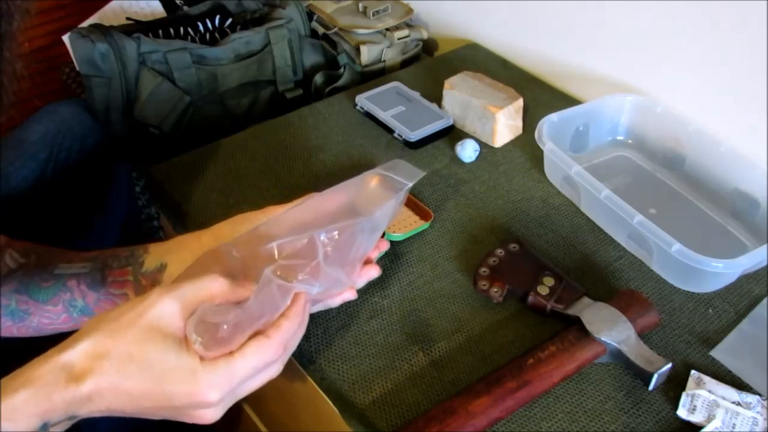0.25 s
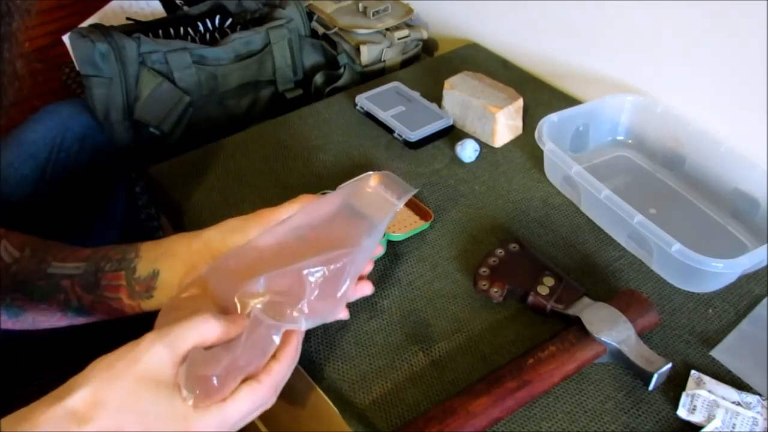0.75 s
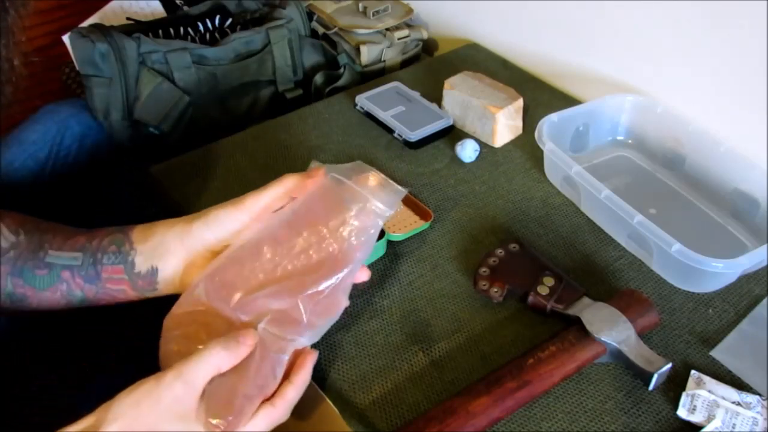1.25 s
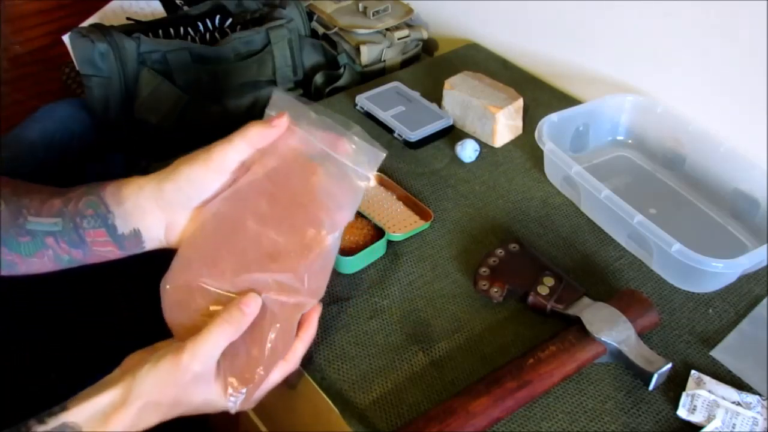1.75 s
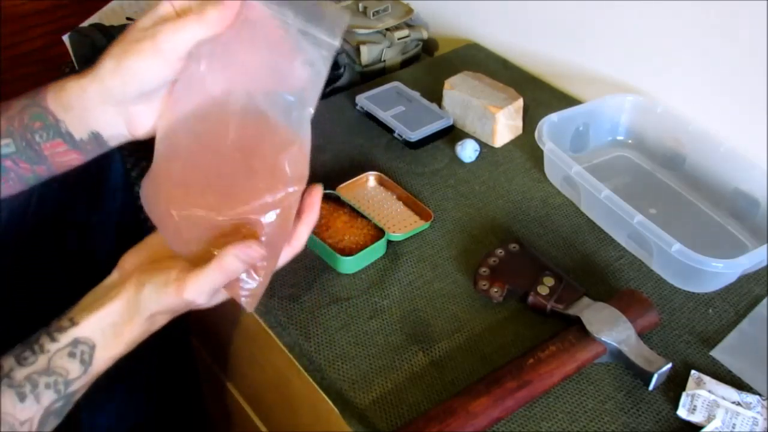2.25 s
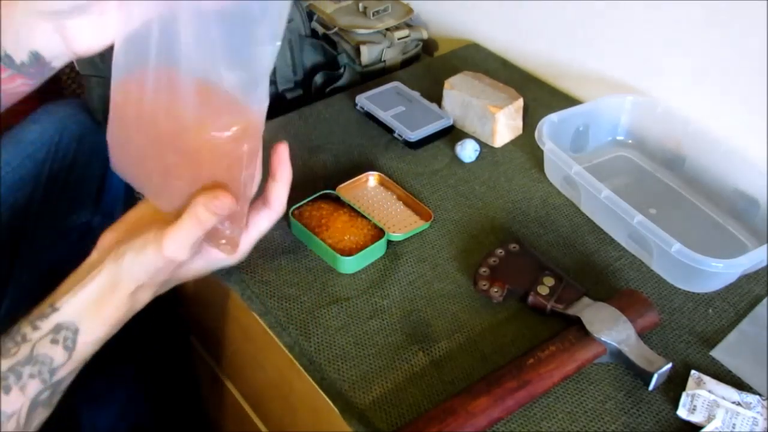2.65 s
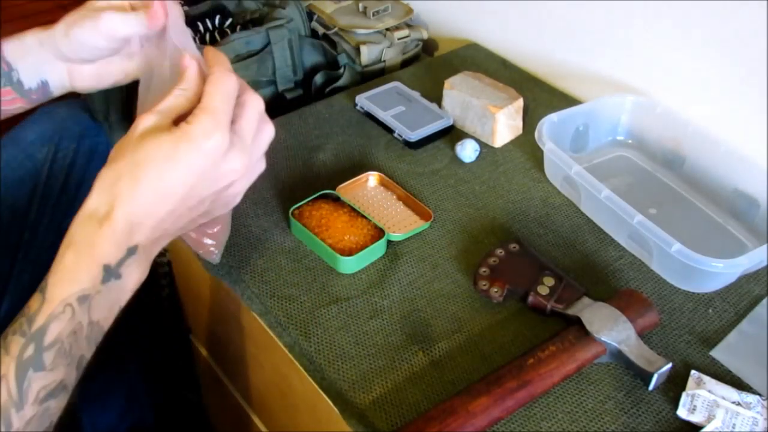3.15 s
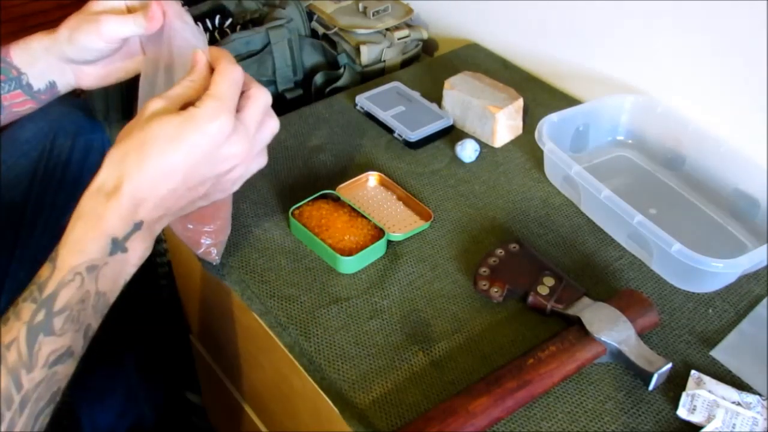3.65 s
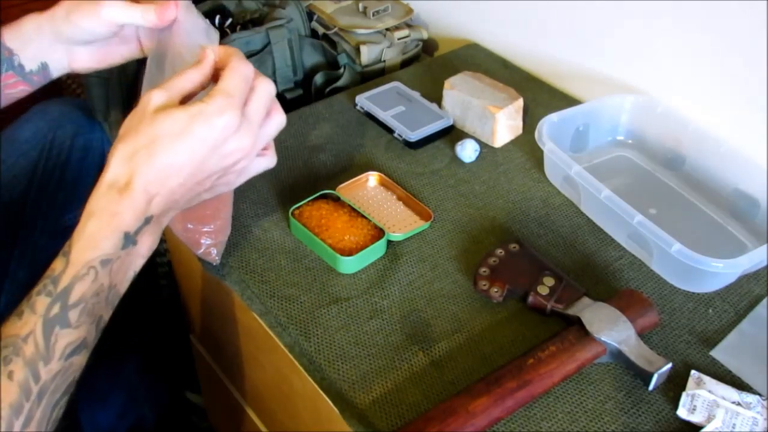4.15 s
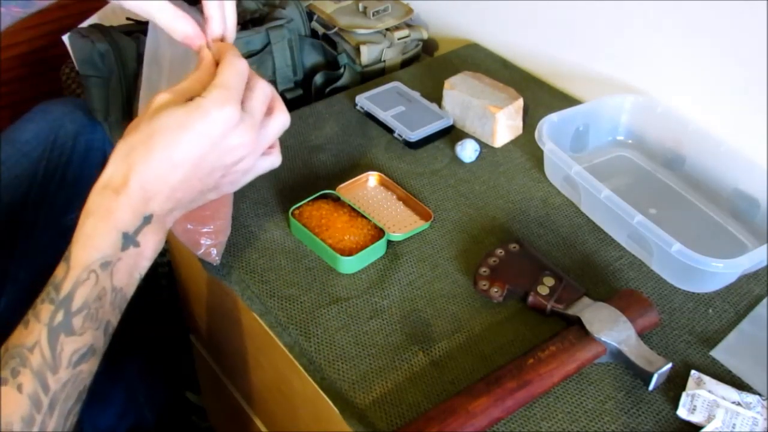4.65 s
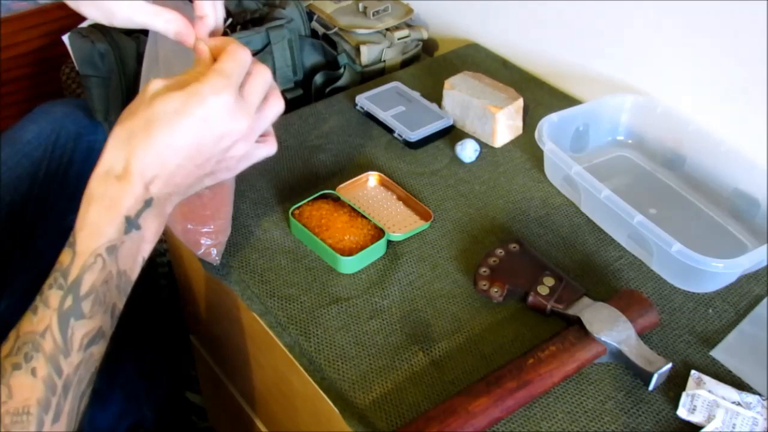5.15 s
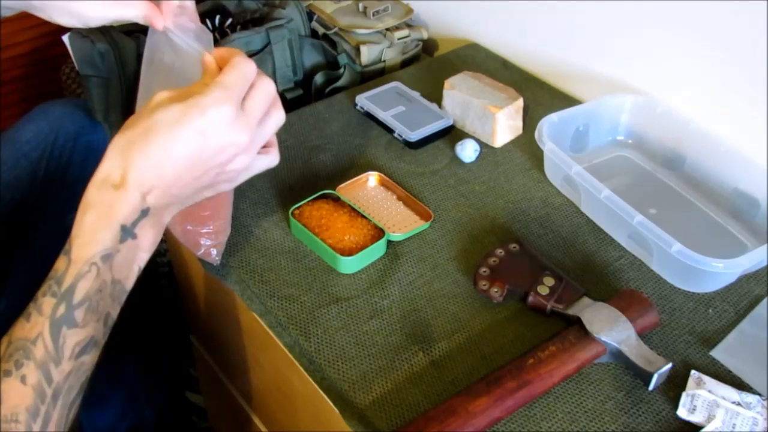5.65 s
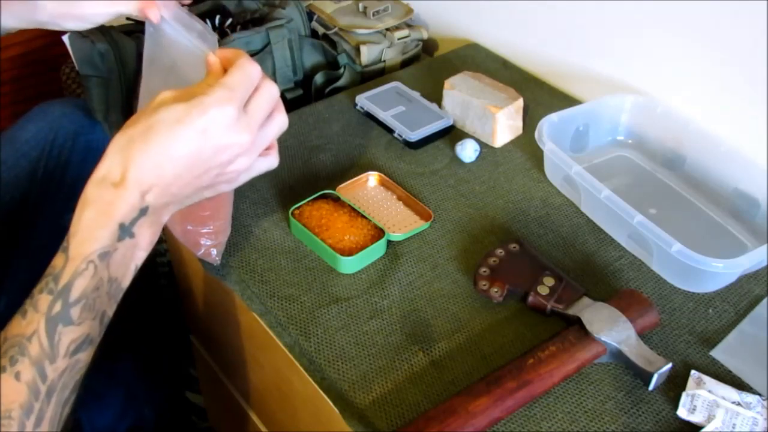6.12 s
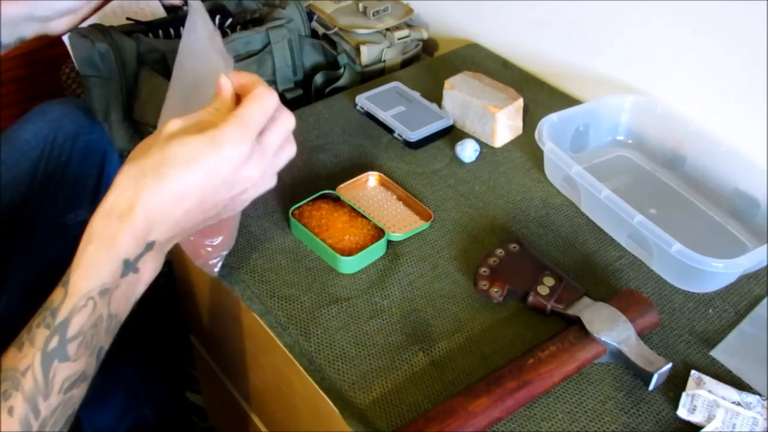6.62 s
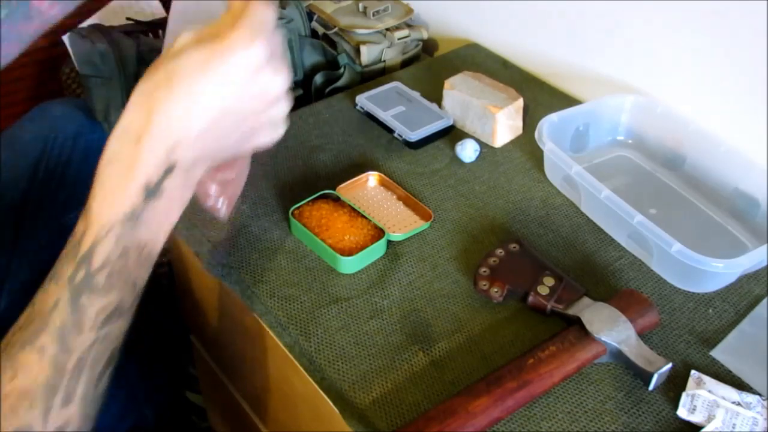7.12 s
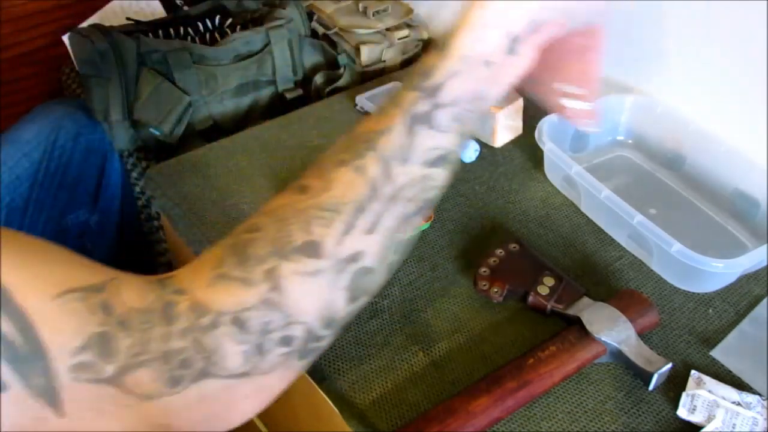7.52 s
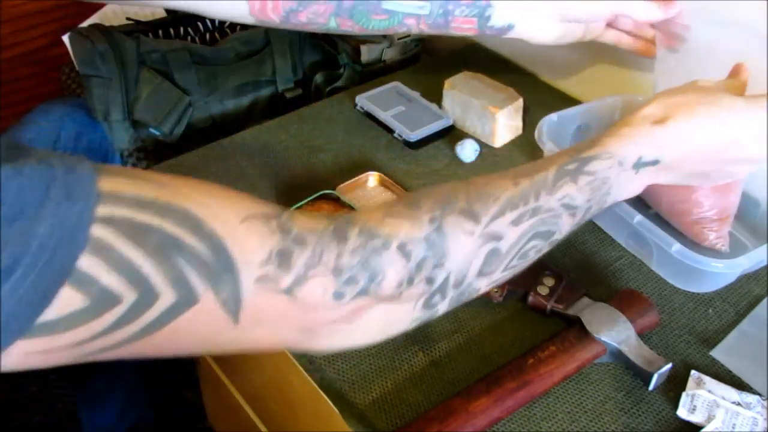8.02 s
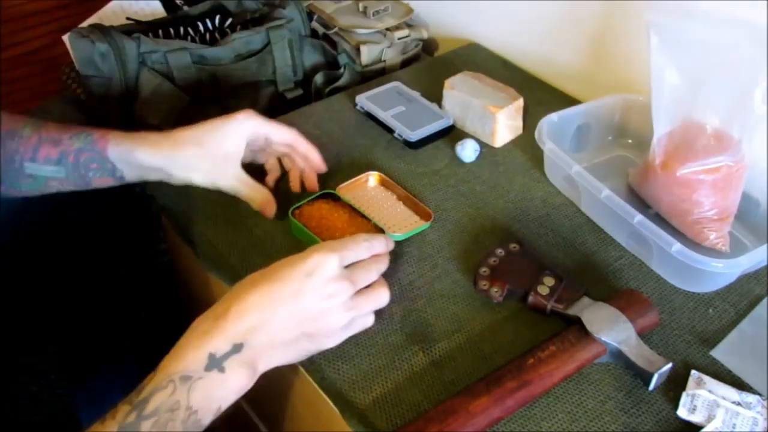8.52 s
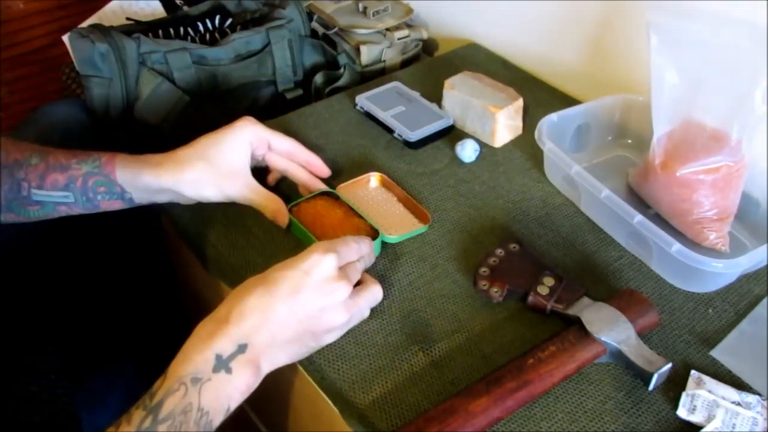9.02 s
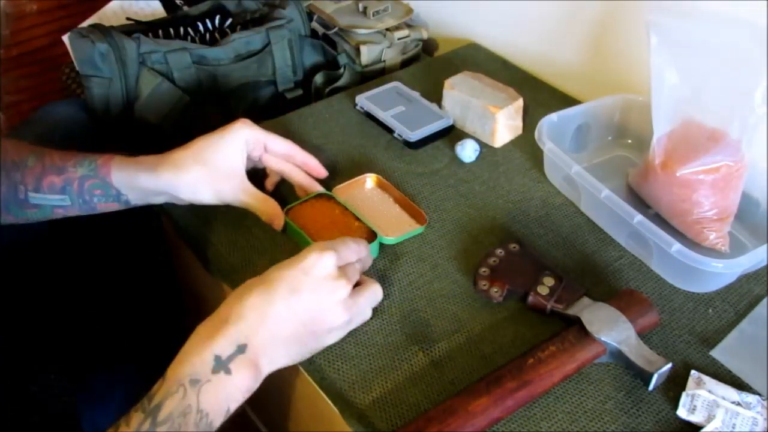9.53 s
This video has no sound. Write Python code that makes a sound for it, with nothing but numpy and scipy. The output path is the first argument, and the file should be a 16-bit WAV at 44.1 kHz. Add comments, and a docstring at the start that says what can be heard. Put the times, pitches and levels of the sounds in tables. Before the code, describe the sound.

A small quiet room, heard closely in stereo, with a steady soft hush, wide in the bass. From 0 to 1.3 s beads slide faintly in a plastic bag, with a hollow airy hum and a few light film clicks. From 1.4 to 2.8 s the slide swells into hissing, pattering swishes, with sharp snaps around 2.1 s. From 2.9 to 4.4 s the film crinkles in bursts, strongest near 3.2 and 4.25 s. Sparse, quieter rustles continue to 6.2 s, then thicker crackling runs from 6.3 to 7.1 s. A crisp rustle comes at 7.5 s, and the loudest crunch at 7.9 s as the bag lands in a tub, with a last snap at 8.1 s. After a near-silent moment, a bead-filled tin rattles finely from about 8.8 s, growing brighter to the end, with dull taps near 8.9 and 9.6 s and soft low table nudges.

```python
"""A quiet room: hands tilt, lift and close a plastic bag of small hard beads over a table.
Beads slide and patter as noise shaped by random bursts, air in the bag hums, film snaps as clicks and pops.
The bag is dropped in a tub, a burst of loud rustles; then a filled tin is shaken gently, its beads rattle
and it taps the table mat as decaying tones. Arms stir softly, the room rings and a steady hush lies beneath.
Two close microphones hear it, and the hush is wide in the bass."""
import sys
import numpy as np
from scipy import signal
from scipy.fft import rfft, irfft, next_fast_len
from scipy.io import wavfile
from scipy.ndimage import uniform_filter1d, map_coordinates

SR = 44100
rng = np.random.default_rng(int(sys.argv[2]) if len(sys.argv) > 2 else 0)


def master_out(mix):
    """Clip the mix to full scale and print it as 16-bit PCM to the path in sys.argv[1]."""
    frames = np.transpose(np.atleast_2d(mix))
    ceiling = np.clip(frames, -1, 1)
    pcm = np.round(ceiling * 32767).astype(np.int16)
    wavfile.write(sys.argv[1], SR, pcm)


def gain_from_db(level_db):
    """Turn a decibel level (scalar or array-like) into a linear amplitude factor."""
    decades = np.asarray(level_db, float) / 20
    return 10 ** decades


N = 431279

# steady room and microphone noise: f/Hz, level per Hz/dB
HUSH_SPECTRUM = [(12, -55), (20, -21.5), (111, -6.5), (199, -6), (271, -2), (339, -1.5), (531, -3.5),
                 (594, -4), (1340, -6.5), (2090, -10), (8270, -16), (14900, -22.5), (16200, -34)]
# width of that noise: f/Hz, side minus mid level/dB
HUSH_WIDTH = [(60, 9), (110, 10), (200, 7.5), (380, 6), (700, 5.5), (1290, 2), (2380, 1), (4400, -1),
              (8120, 1), (15000, -2)]
# soft stir of arms and cloth: f/Hz, level per Hz/dB
STIR_SPECTRUM = [(25, -9.0), (60, -2), (150, -2.0), (260, -4), (400, -30.0)]
# beads sliding in the bag, pouring first, then a faint stir in the hands:
# t/s, patter level/dB, body re patter level/dB, finest hiss re patter level/dB
SLIDE = [(0, -42, -12, -6), (.27, -40, -16, -6), (.34, -45, -10, 2), (.47, -45, -4.5, 0.5),
         (.61, -51, -5, -3.5), (.74, -54.5, -5, -0.5), (.93, -50.5, -4.5, 2), (1.13, -52, -3, -3),
         (1.234, -43, -3.5, -3.5), (1.33, -43, -4, -1.5), (1.448, -34.5, -11, 0), (1.48, -38, -5, -3),
         (1.62, -35, -3.5, -2.5), (1.77, -32, -5, 0.5), (1.86, -32, -0.5, 0.5), (1.966, -37, -2.5, 2.5),
         (2.08, -40, -1, 2), (2.24, -41, -2, 3.5), (2.3, -38.5, -1.5, 2.5), (2.468, -30, -1, 1.5),
         (2.544, -42, 0, 2), (2.638, -41.5, -4.5, -3), (2.748, -32.5, -2, 1.5), (2.896, -56.5, 1, -2),
         (3.45, -51, 2, 2.5), (3.77, -61, 0.5, -0.5), (4.1, -53, 0.5, -1.5), (4.5, -66, 1, 3),
         (4.7, -54, -4.5, -11), (4.9, -60, 6, -4), (5.5, -58, 5.5, 4), (5.95, -54, -6, -6.5),
         (6.3, -62, 7, -7), (6.36, -56, 4, -9), (6.5, -41, -1, 4), (6.6, -43, -2.5, -1.5),
         (6.75, -50.5, 2, -2.5), (7.25, -62.5, -4, 5), (7.5, -55, 7.5, -12), (7.62, -46.5, 0, 2.5),
         (7.7, -45.5, 4, 1.5), (7.8, -54, 5, -2), (8.22, -72, 12, -8), (8.5, -92, -6, -7)]
# rustles, a grip or jolt shakes film and beads: peak t/s, patter level/dB, rise t/s, fall t/s,
# body re patter level/dB, finest hiss re patter level/dB
RUSTLES = [(.62, -42, 0.0037, 0.082, 1, 4.5), (.942, -40, .015, .03, -6.5, -4),
           (1.01, -46.5, 0.0066, .05, 0, -10), (1.197, -45.5, .008, .12, -3, -7),
           (1.335, -41, 0.0044, .06, -8, -6), (1.741, -32.5, .008, .1, 3, 2),
           (1.978, -32.5, 0.0055, .08, 4, 0), (2.097, -36.5, .005, .05, 3, -4),
           (2.123, -34, .004, 0.063, -8, -6), (2.159, -36, .005, .08, 3.5, -9),
           (2.257, -34.5, .006, .07, 2, 4.5), (2.903, -43, 0.0054, .04, 0, 4),
           (2.971, -35, .015, .055, -4, 2.5), (3.089, -36.5, .07, .08, 0, -9),
           (3.171, -35, .01, .2, -5.5, -9), (3.21, -34, .06, 0.11, -1, 0.5),
           (3.244, -29.5, .06, 0.042, -17, -0.5), (3.321, -39, .2, .13, -5.5, -1.5),
           (3.645, -47, .02, .05, -1, -21), (3.699, -43, .04, 0.079, -0.5, -8),
           (3.835, -50.5, .03, .04, 3, -13), (3.897, -47.5, 0.0059, .04, 1, -11),
           (3.984, -48.5, .005, .06, -2, 1), (4.14, -36.5, .015, 0.048, -8, -6),
           (4.23, -28, .004, .05, -21, -0.5), (4.296, -32, .1, 0.073, 1.5, -5.5),
           (4.342, -40.5, 0.0035, .05, 1, -2), (4.41, -49, .01, .1, 3, 1), (4.428, -51, .015, .05, 6, -5),
           (4.54, -53, .006, .2, 6, 0.5), (4.629, -44, .02, .02, -14, -15), (4.656, -50, .006, .15, 5, -18),
           (5.001, -45, .006, .1, -2.5, -12), (5.171, -43.5, .006, .2, 0, -6),
           (5.229, -42, .09, .15, 1, -15), (5.27, -42.5, .01, 0.055, 3, 2.5),
           (5.383, -39, 0.081, 0.087, -0.5, -1), (5.447, -36.5, .006, 0.045, -5, -4),
           (5.55, -51, .05, .1, 0, 1), (5.62, -41, .005, .07, 3.5, -16), (5.714, -45.5, .08, .08, -9, -17),
           (5.85, -52.5, .05, .2, 3, -18), (6.055, -54, .01, .15, 4, -16), (6.125, -47, .1, .07, 0.5, -22),
           (6.238, -44.5, .03, 0.065, 0.5, -6), (6.303, -38.5, .004, 0.054, -7, -2),
           (6.368, -35.5, .005, .15, -18, 3.5), (6.415, -30, .075, .07, -2, -5),
           (6.64, -43, .006, .06, -4, -10), (6.688, -39, .07, .06, -3, -16), (6.798, -29, .005, .09, -1, 0),
           (6.887, -39, 0.0091, .15, 2, -2), (6.938, -33, .01, .1, -1, -2),
           (6.995, -28, .04, .1, -1.5, -6.5), (7.05, -31.5, .1, .07, -1, -3),
           (7.122, -43.5, .03, .09, 1, -11), (7.22, -43.5, 0.0054, .055, -1, -11),
           (7.37, -47.5, .12, .1, -3.5, -7), (7.47, -51.5, .1, .2, -3, -20),
           (7.524, -25.5, .005, .035, -7, -3.5), (7.56, -31.5, .04, .1, 0, -3.5),
           (7.792, -38.5, .006, .075, 0.5, -6), (7.886, -22.5, .012, .1, -11, 6),
           (7.903, -15, .03, 0.05, -12, -7), (7.95, -32, .03, .09, -3, -20), (8.1, -43, .04, .02, 0, -5.5),
           (8.111, -37.5, .004, .065, -4, -3)]
# share of the bag's body sound (as power) that is air-pocket hum: t/s, share
POURING = [(0, 1.0), (.6, 0.78), (1.4, 1.0), (2.5, 0.54), (2.7, 0.11)]
# resonances of the air in the bag: f/Hz, width f/Hz, level/dB
AIR_POCKET = [(490, 76, -7.5), (798, 98, 1), (1130, 36, 4), (1270, 103, 4.5), (1490, 226, 1.5),
              (1696, 130, -0.5), (2300, 710, -7.5)]
# bead noise that drives the air: f/Hz, level per Hz/dB
AIR_DRIVE = [(250, -30), (600, -2.5), (2000, -4.5), (4000, -11)]
# body sound of the film: f/Hz, level per Hz/dB
FILM_SPECTRUM = [(88, -38), (150, -4), (385, -5.5), (511, -1), (809, -7), (885, -3.5), (2200, -4.5),
                 (2860, -14.5), (4840, -120)]
# beads on the film: f/Hz, level per Hz/dB
PATTER_SPECTRUM = [(1000, -16), (1700, -3.5), (2610, 0), (3380, -2.5), (4490, -4), (4980, -4),
                   (8000, -12.5), (10400, -16.5), (17600, -120)]
# finest hiss of the bag: f/Hz, level per Hz/dB
HISS_SPECTRUM = [(3820, -8.5), (6500, 1), (7930, 0), (10800, -4), (11700, -5), (15200, -12.5),
                 (16200, -59.5)]
# where the hands are: t/s, left minus right level/dB
PLACE = [(0.0, -1.5), (0.74, -2), (2.59, -1.0), (5.09, -2), (5.69, -2), (6.65, -1.5), (7.62, -2),
         (8.33, -5.5), (8.39, -0.5), (9.78, -1.5)]
# side signal of the close sounds: f/Hz, side gain as level/dB
NEAR_WIDTH = [(150, -29), (500, -7.5), (1500, -6), (4000, -5), (8000, -4), (15000, 1.5)]
# decay of the room: f/Hz, t60 t/s
ROOM_DECAY = [(200, 0.43), (1500, 0.36), (6000, 0.27), (15000, 0.12)]
# decay of the scatter off hands and table: f/Hz, t60 t/s
SCATTER_DECAY = [(500, 0.023), (10000, .01)]
# clearest film snaps and single bead clicks, before a common trim:
# t/s, click level/dB, click f/Hz, pop re click level/dB, pop f/Hz
SNAPS = [(0.2882, -30, 4200, -8, 2260), (0.3804, -29, 3200, -13, 2640), (0.4224, -30, 6820, -15, 1280),
         (0.4404, -28, 4890, -8, 2140), (0.4514, -33, 4830, -4, 1470), (0.6196, -11, 8100, -11.5, 1130),
         (0.7994, -36, 9080, -14, 2600), (0.9073, -35, 5540, -8, 1340), (0.9388, -26, 3930, -6, 2800),
         (1.0071, -33, 5400, 2, 2410), (1.1954, -44, 5050, -6, 1310), (1.2599, -28, 4650, -9, 1130),
         (1.3336, -14, 8550, -24, 2820), (1.4144, -19, 4180, -13, 1340), (1.9782, -20.5, 3210, 3, 1630),
         (2.0622, -18, 4970, -16, 2180), (2.0961, -14, 8980, -16, 1320), (2.1054, -24, 8520, -0.5, 773),
         (2.121, -1, 8800, -19.5, 1880), (2.1314, -11, 8150, -16, 3000), (2.1434, -25, 7670, 0, 1640),
         (2.1594, -25, 4580, 2.5, 770), (2.1694, -30, 6350, -4, 773), (2.1949, -22, 6990, -17, 2200),
         (2.2548, -20, 3270, -8, 1330), (2.356, -17.5, 7120, -8, 1170), (2.3815, -18, 6190, -10, 2200),
         (2.433, -18, 4320, -7, 2510), (2.4647, -21, 5130, -7, 2300), (2.4984, -15, 5780, 0, 2540),
         (2.7183, -16.5, 7590, -5, 2030), (2.758, -21, 6260, -5, 2960), (2.9024, -20, 4500, -8, 1490),
         (2.9713, -12, 6860, -20, 1540), (3.0584, -33, 4020, -4, 2200), (3.1712, -20, 5940, -17, 1390),
         (3.1892, -12, 6480, -15, 1670), (3.2425, -14, 3910, -14, 1540), (3.3209, -18.5, 5450, -24, 799),
         (3.4084, -39, 5030, 6.5, 2020), (3.476, -28.5, 4860, -3, 2690), (3.645, -40.5, 3160, 8, 2800),
         (3.6985, -30.5, 3000, -6, 2910), (3.8334, -46, 3120, 6, 2010), (3.895, -35, 4500, -5, 1310),
         (3.9335, -41, 5060, -10, 1530), (3.9504, -36, 6900, -18, 2210), (3.9828, -40, 3550, -8, 1840),
         (4.1267, -29, 7770, -9, 2330), (4.135, -26, 5810, -14, 2330), (4.2303, -8.5, 4220, -26, 2940),
         (4.2752, -19, 3190, -12.5, 530), (4.2964, -19, 3160, -4, 1670), (4.3403, -25, 7720, 4.5, 1010),
         (4.4059, -35, 5900, -6, 1860), (4.5394, -43, 3550, 0, 616), (4.6243, -32, 3780, -4, 2720),
         (4.657, -34, 3740, -13, 1580), (4.7042, -39, 3460, -10, 1110), (4.7734, -39, 3440, -4, 1560),
         (4.9294, -47, 3490, -2, 1370), (5.0008, -27.5, 3490, -12, 1820), (5.1627, -33, 4570, -2, 2070),
         (5.1704, -36, 4680, -3, 1870), (5.2066, -31, 4230, -9, 541), (5.2586, -27, 4320, -3, 1110),
         (5.2694, -21.5, 8540, -17, 1550), (5.3566, -23.5, 4890, -7, 2480), (5.446, -25, 5040, -0.5, 1720),
         (5.6196, -30, 6060, -1, 1990), (5.6263, -32, 4330, 0, 1340), (5.7033, -29, 3870, -4, 1880),
         (5.856, -37, 4000, -8, 2310), (5.94, -42, 3070, -2, 606), (5.9794, -38, 5520, -8, 721),
         (6.0536, -36, 5250, -6, 2470), (6.101, -37, 3310, -8, 1570), (6.119, -31, 5260, -13, 1390),
         (6.2366, -27, 5960, -16, 1270), (6.3021, -19.5, 6540, -12, 2270), (6.3664, -13, 7170, -23, 2510),
         (6.3779, -13, 6070, -11, 2060), (6.418, -22, 4690, -13, 1760), (6.5824, -25, 3300, -14, 2650),
         (6.6378, -31, 5230, -11, 2830), (6.6832, -28, 3800, 1, 2670), (6.7993, -23, 3180, -18, 1390),
         (6.8882, -28, 3290, -16, 2960), (6.9386, -13.5, 6370, -18, 2550), (6.9564, -21, 6680, -12, 1210),
         (6.9944, -17, 3110, -13, 1980), (7.0419, -12, 8120, -8, 1440), (7.1132, -31.5, 3610, -1, 1020),
         (7.1494, -43, 3780, -3, 2480), (7.2188, -27, 5060, -12, 2300), (7.3287, -34.5, 3770, -3, 1550),
         (7.3647, -35, 3360, -13, 2710), (7.5049, -26, 3300, -4, 1180), (7.524, -13, 6030, -20, 2080),
         (7.5557, -16, 6940, -13, 1050), (7.584, -24, 7920, -9, 1180), (7.6695, -26, 7910, -7, 947),
         (7.7664, -32, 3730, -7, 1190), (7.792, -21, 5880, -11, 1320), (7.8535, -31, 3930, -10, 2060),
         (7.8686, -25, 5700, -4, 1200), (7.8845, -3, 4350, -5, 2540), (7.9897, -26, 3360, -15, 2500),
         (8.1118, -12.5, 10300, -14.5, 1610), (8.6477, -40, 3860, -13, 791), (8.7839, -32, 7780, -22, 2350),
         (8.8087, -32, 5900, -17, 2060), (8.9695, -34, 4400, -32, 571), (9.0688, -30, 8900, -27, 2290),
         (9.085, -22, 10700, -34, 2580), (9.1188, -25, 9910, -32, 2860), (9.1765, -22, 9330, -29, 2330),
         (9.2065, -21, 7540, -30, 2360), (9.2494, -21, 10700, -32, 2330), (9.2798, -18, 9610, -36, 2050),
         (9.408, -23, 7300, -29, 2580), (9.4644, -20, 10800, -27, 2960), (9.5123, -24, 4220, -27, 2770),
         (9.6804, -19, 10900, -26, 2500), (9.7184, -20, 7130, -28, 2680), (9.7564, -24, 11100, -30, 1770)]
# the shaken tin, before a common trim: t/s, bead rattle level/dB, finest hiss re rattle level/dB
SHAKE = [(8.55, -84, -7), (8.64, -75, -7), (8.652, -57, -15), (8.75, -64, -7), (8.8, -49.5, -5),
         (8.854, -60, -9), (8.878, -53, -3), (9.04, -58, -1), (9.076, -45, -2), (9.26, -40, 2.5),
         (9.52, -39, -1), (9.545, -41, -1), (9.578, -34, -2), (9.636, -35, 0), (9.722, -31.5, 0.5),
         (9.78, -39, 0)]
# beads in the tin: f/Hz, level per Hz/dB
RATTLE_SPECTRUM = [(880, -47), (1500, -18), (1950, -14), (2280, -8), (2840, -8.5), (3300, -3.5), (9000, -3),
                   (11700, -30), (19800, -120)]
# finest hiss of the tin: f/Hz, level per Hz/dB
RATTLE_HISS = [(4410, -10.5), (7500, 2), (10800, 10), (12600, 4), (15200, 4), (16200, -26)]
# tin on the mat, before a common trim: t/s, level/dB
TAPS = [(8.911, -37.5), (9.631, -36)]
# modes of the filled tin: f/Hz, level/dB, t60 t/s
TIN_MODES = [(374, -10, 0.041), (473, -4, 0.044), (610, 1.5, 0.04), (970, -3, 0.037), (1096, -0.5, 0.041),
             (1260, -4.5, 0.028)]
# nudges of the table top: t/s, level/dB
THUDS = [(8.563, -43), (9.068, -40), (9.442, -39), (9.522, -35), (9.67, -38), (9.749, -33)]
# the one mode of the table top: f/Hz, t60 t/s
TABLE_MODE = (183, 0.1)


def unit(x):
    """Scales to rms 1."""
    return x / np.sqrt(np.mean(x ** 2) + 1e-20)


def peak(x):
    """Scales to peak 1."""
    return x / np.max(np.abs(x))


def along(points, hz):
    """Reads (f/Hz, value) points on a log frequency axis."""
    f, v = np.transpose(points)
    return np.interp(np.log(hz + 1), np.log(f + 1), v)


def curves(rows):
    """One value per sample for each column after the time; the level is -120 dB outside the rows."""
    s, level, *cols = np.transpose(rows)
    t = np.arange(N) / SR
    return [np.interp(t, s, level, -120, -120)] + [np.interp(t, s, c) for c in cols]


def wobble(rate):
    """A smooth random curve, rate knots a second."""
    knots = rng.standard_normal(int(N * rate / SR) + 4)
    return map_coordinates(knots, [np.arange(N) * rate / SR])


def filtered(x, response):
    """Shapes x by a response of frequency."""
    m = next_fast_len(N + SR // 2)
    return irfft(rfft(x, m) * response(np.fft.rfftfreq(m, 1 / SR)), m)[..., :N]


def patter(spectrum, per_s, spread_db, life, blur, clump_db, ring=lambda hz: 1):
    """Random bursts of uneven size dying over life seconds, over a blur of tiny contacts; mid and side, rms 1."""
    chance, size = rng.random((2, N))
    hits = (chance < per_s / SR) * gain_from_db(-spread_db * np.log(size + 0.0086))
    bursts = signal.fftconvolve(hits, np.exp(-np.arange(SR // 50) / SR / life))[:N]
    strength = np.sqrt((1 - blur) * unit(bursts) ** 2 + blur)
    clumps = gain_from_db(clump_db * (0.77 * wobble(30) + wobble(110)))  # beads move in little avalanches
    noise = strength * clumps * rng.standard_normal((2, N))
    return unit(filtered(noise, lambda hz: gain_from_db(along(spectrum, hz)) * ring(hz)))


def add(track, s, sound):
    """Mixes a short sound in at s seconds."""
    part = track[round(s * SR):][:len(sound)]
    part += sound[:len(part)]


def tails(t60s, length):
    """Two unrelated noise tails scaled by the first one's energy; each frequency dies at its own speed."""
    hz, t, z = signal.stft(rng.standard_normal((2, length)), SR, nperseg=128)
    decay = gain_from_db(-60 * t / along(t60s, hz)[:, None])
    tail = signal.istft(z * decay, SR, nperseg=128)[1]
    return tail / np.linalg.norm(tail[0])


def hush():
    """Steady room and microphone noise, wide in the bass."""
    hush_db = -60.5  # rms of the mid signal

    def shape(hz):
        return gain_from_db(along(HUSH_SPECTRUM, hz)) * np.array([hz * 0 + 1, gain_from_db(along(HUSH_WIDTH, hz))])

    mid, side = filtered(rng.standard_normal((2, N)), shape)
    return gain_from_db(hush_db) * np.array([mid + side, mid - side]) / np.std(mid)


def rumble(body_gain):
    """Arms and cloth near the table: a soft, low, wide stir that swells when the lifted bag is handled."""
    steady_db, swell_db = -70, -28.5  # swell is relative to the bag's body gain
    lifted_s = 2.65  # the swell starts here
    dip_from_s, dip_to_s, dip_db = 1.3, 2.65, -7  # the steady low rumble is quieter here
    mid, side = patter(STIR_SPECTRUM, per_s=48, spread_db=2.5, life=.012, blur=0.63, clump_db=1.9)
    t = np.arange(N) / SR
    dip = (t > dip_from_s) & (t < dip_to_s)
    swell = np.abs(uniform_filter1d(body_gain ** 2 * (t > lifted_s), size=SR // 16))
    steady = gain_from_db(steady_db + dip_db * dip + 0.8 * wobble(2.3))
    level = np.sqrt(steady ** 2 + gain_from_db(swell_db) ** 2 * swell)
    return level * np.array([mid + 1.5 * side, mid - 1.94 * side])


def handling():
    """Gains of patter, body and hiss: the slide plus every rustle, added as powers."""
    swing_db = 20  # a rustle's rise and fall times each span this much
    t = np.arange(0, N, 32) / SR
    s, db, rise, fall, body_db, fine_db = np.transpose(RUSTLES)[:, :, None]
    away = np.where(t < s, (s - t) / rise, (t - s) / fall)
    power = gain_from_db(db - swing_db * away) ** 2
    shares = gain_from_db(np.hstack([0 * db, body_db, fine_db]).T) ** 2
    rustle = np.array([np.interp(np.arange(N) / SR, t, p) for p in shares @ power])
    slide_db, body_db, fine_db = curves(SLIDE)
    slide = gain_from_db([slide_db, slide_db + body_db, slide_db + fine_db])
    return np.sqrt(rustle + slide ** 2)


def air_pocket(f):
    """Response of the air in the bag: bandpass resonances of alternating sign."""
    total = 0
    for k, (centre, width, db) in enumerate(AIR_POCKET):
        damping = 1j * f * width
        total = total + (-1) ** k * gain_from_db(db) * damping / (centre ** 2 - f * f + damping)
    return total


def bag(patter_gain, body_gain, fine_gain):
    """Beads slide on the film; the air pocket in the full bag hums while it pours."""
    pouring = np.interp(np.arange(N) / SR, *np.transpose(POURING))
    hum = patter(AIR_DRIVE, per_s=360, spread_db=4.0, life=0.0023, blur=0.39, clump_db=1.4, ring=air_pocket)
    film = patter(FILM_SPECTRUM, per_s=250, spread_db=3.0, life=0.0039, blur=0.38, clump_db=1.1)
    body = np.sqrt(pouring) * hum + np.sqrt(1 - pouring) * film
    # the negative spread makes most bead hits alike and a few much smaller
    beads = patter(PATTER_SPECTRUM, per_s=1000, spread_db=-3.0, life=0.0014, blur=0.67, clump_db=1.2)
    fine = patter(HISS_SPECTRUM, per_s=600, spread_db=4.0, life=0.00077, blur=0.72, clump_db=1.8)
    return gain_from_db(-2.5) * (patter_gain * beads + body_gain * body + fine_gain * fine)


def room(mid):
    """The room's answer: two unrelated decaying noise tails, starting 260 samples late."""
    late = np.pad(mid, (260, 0))[None]
    return gain_from_db(-11.0) * signal.fftconvolve(late, tails(ROOM_DECAY, SR // 2), axes=1)[:, :N]


def scatter(knocks):
    """Knocks bounce off hands and table: a very short noise tail for the side signal."""
    return signal.fftconvolve(knocks, tails(SCATTER_DECAY, SR // 16)[0])[:N]


def snaps(rows):
    """A crease flips or a bead strikes: a bright click, a duller pop of the sheet, then a dying crackle."""
    lag_s = .0012  # each click starts this long after its listed time
    # crackle re click for a row at -27 dB, and how far it lags behind louder rows, dB per dB
    crackle_base_db, crackle_shrinks = -14.5, 0.38
    out, t = np.zeros(N), np.arange(SR // 10) / SR
    noises = rng.standard_normal((len(rows), len(t)))
    for (s, db, hz, pop_db, pop_hz), noise in zip(rows, noises):
        click = peak(t * np.exp(-t * hz / 0.81) * np.sin(2 * np.pi * hz * t))
        # a rough crack, partly coloured by the click and partly broad
        coloured = unit(np.convolve(noise, click[:SR // 1000])[:len(t)])
        rough = 0.25 * coloured + 0.23 * np.diff(noise, prepend=0)
        click = peak(click + np.exp(-t / 0.0005) * rough)
        pop = peak(t * np.exp(-t * (pop_hz + 600) / 0.85) * np.sin(2 * np.pi * pop_hz * t))
        pop = gain_from_db(pop_db + 2.0) * pop
        # tiny creases sound like the big one, only shorter
        colour = ((click + pop) * np.exp(-t / 0.0011))[:SR // 200]
        crackle_db = crackle_base_db - crackle_shrinks * (db + 27) + max(pop_db, 0)
        crackle = gain_from_db(crackle_db - 60 * t / 0.048) * unit(np.convolve(noise, colour)[:len(t)])
        add(out, s + lag_s, gain_from_db(db - 2.5) * (click + pop + crackle))
    return out


def small_snaps(level):
    """Rows like SNAPS for lesser creases at random moments, denser and louder where the bag is busier."""
    count, busy = 70, 0.33  # busy: power of the patter gain that crowds them
    over_patter_db, spread_db, pop_db = 10.5, 3, -16
    when, size, pitch, pop, pop_pitch = rng.random((count, 5)).T
    crowd = np.cumsum(level ** busy)
    at = np.searchsorted(crowd, when * crowd[-1])
    db = 20 * np.log10(level[at]) + over_patter_db - spread_db * np.log(size + .05)
    click_hz, pop_hz = 3000 * 3 ** pitch, 1200 * 2.5 ** pop_pitch
    return np.transpose([at / SR, db, click_hz, pop_db + 12 * (pop - .5), pop_hz])


def rattle():
    """Beads rattle in the shaken tin: a dense noise and a sparser, finer hiss."""
    rattle_db, fine_db = curves(SHAKE)
    beads = patter(RATTLE_SPECTRUM, per_s=380, spread_db=0.3, life=0.0013, blur=1.0, clump_db=1.46)
    fine = patter(RATTLE_HISS, per_s=420, spread_db=4, life=0.00096, blur=0.31, clump_db=3.5)
    return gain_from_db(rattle_db - 3.5) * (beads + gain_from_db(fine_db) * fine)


def tin():
    """The tin taps the mat, ringing in damped modes, and nudges the table top into a low damped tone."""
    out, t = np.zeros(N), np.arange(SR // 4) / SR
    ring = sum(gain_from_db(level - 60 * t / t60) * np.sin(2 * np.pi * hz * t) for hz, level, t60 in TIN_MODES)
    for s, db in TAPS:
        drag = rng.standard_normal(len(t)) * gain_from_db(-60 * t / 0.1)  # it drags on the mat
        scuff = np.convolve(drag, ring[:SR // 100])[:len(t)]
        add(out, s, gain_from_db(db - 8) * (0.6 * ring + 0.1 * scuff) * (1 - np.exp(-t / 0.001)))
    table_hz, table_t60 = TABLE_MODE
    for s, db in THUDS:
        thud = gain_from_db(db - 60 * t / table_t60) * np.sin(2 * np.pi * table_hz * t)
        add(out, s, thud * (1 - np.exp(-t / 0.011)))
    return out


def scene():
    """Direct sound, its scatter off hands and table in the side signal, the room, the stir and the hush."""
    gains = handling()
    mid, side = bag(*gains) + rattle()
    knocks = snaps(SNAPS) + snaps(small_snaps(gains[0])) + tin()
    mid = mid + knocks
    side = filtered(side + scatter(knocks), lambda hz: gain_from_db(along(NEAR_WIDTH, hz)))
    lean = np.interp(np.arange(N) / SR, *np.transpose(PLACE)) / 2
    near = np.array([mid + side, mid - side]) * gain_from_db([lean, -lean]) + room(mid)
    near = filtered(near, lambda hz: (1j * hz / (170 + 1j * hz)) ** 3)  # small things radiate no bass
    return near + rumble(gains[1]) + hush()


def low_pass(x):
    """Removes everything above the highest recorded frequency."""
    return signal.sosfilt(signal.butter(12, 16970, fs=SR, output="sos"), x)


def record(dry):
    """Takes the finished mix to the output."""
    return low_pass(dry)


dry = scene()
out = record(dry)
master_out(out)
```